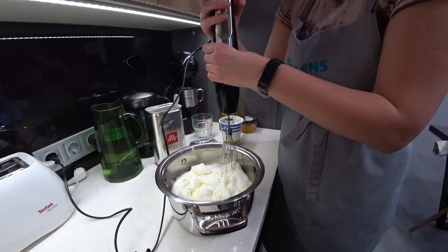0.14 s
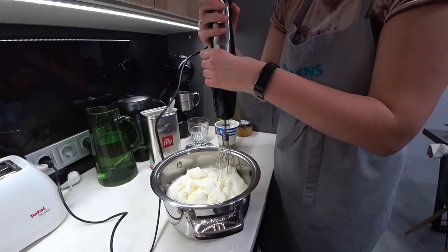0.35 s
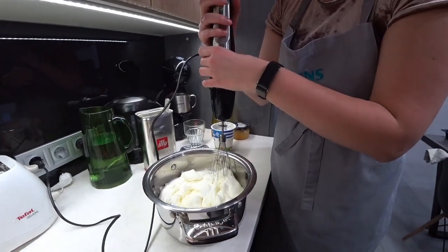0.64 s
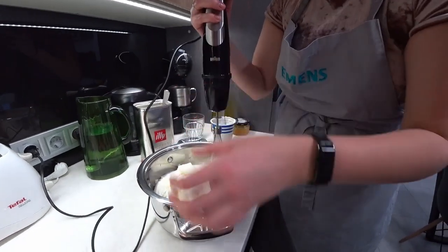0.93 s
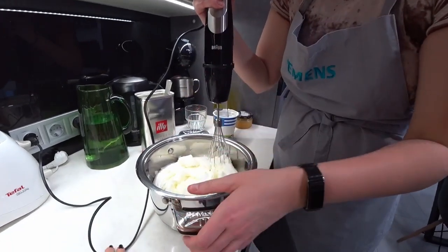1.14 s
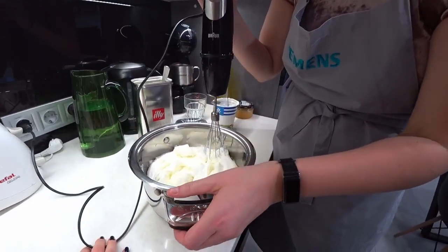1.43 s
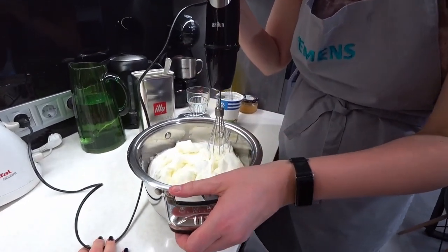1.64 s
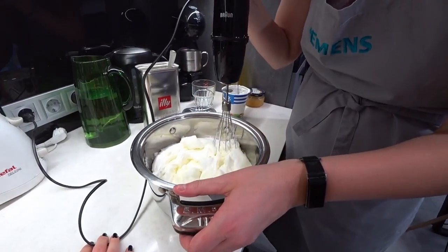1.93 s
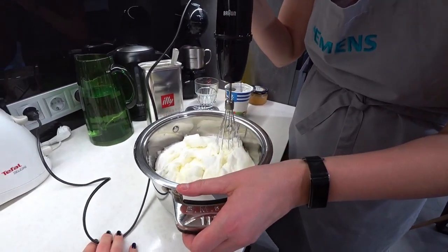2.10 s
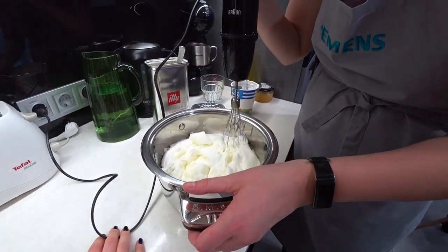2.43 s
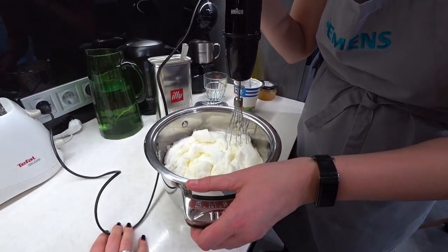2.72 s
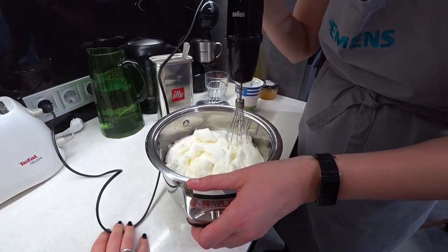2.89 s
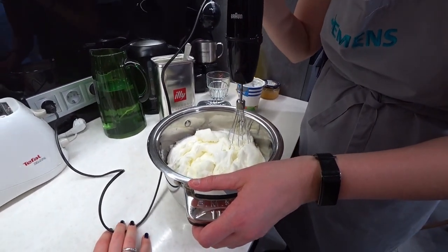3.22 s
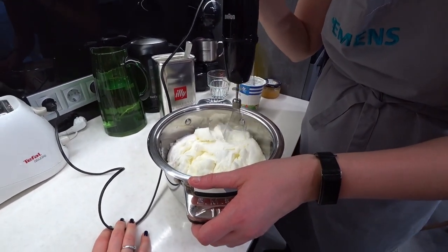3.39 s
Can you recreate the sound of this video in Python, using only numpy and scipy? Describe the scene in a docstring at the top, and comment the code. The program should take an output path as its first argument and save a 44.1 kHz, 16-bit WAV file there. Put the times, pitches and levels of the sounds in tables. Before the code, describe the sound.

An electric hand blender with a whisk starts only around 3.2 seconds, its motor pitch rising quickly into a loud whir with bright, dense metallic rattling until the abrupt end at about 3.55. Before that, low appliance hum, thin steady whine and soft scuffs; whisk ticks on the steel bowl, sharpest near 1.15 and 3.05, clustering around 2.3 and 2.75. Close stereo, short kitchen echo.

```python
"""Appliance hum, a thin whine and room air come first, with soft handling scuffs.
A whisk ticks against a steel bowl now and then: noise scrapes that ring clustered decaying sines.
Then a hand blender is switched on: shaft orders rise in pitch as the motor spins up, inside housing
noise, and the whisk rattles round the bowl as a hail of taps. Ticks and scuffs get a kitchen echo."""
import sys
import numpy as np
from scipy import signal
from scipy.fft import rfft, irfft
from scipy.io import wavfile
from scipy.ndimage import uniform_filter1d

SR = 44100
rng = np.random.default_rng(int(sys.argv[2]) if len(sys.argv) > 2 else 0)


def generate_wav(sig):
    """Save sig (samples, or channels by samples) to the path in sys.argv[1] as 16-bit PCM at SR."""
    pcm = np.round(np.clip(np.atleast_2d(sig).T, -1, 1) * 32767).astype(np.int16)
    wavfile.write(sys.argv[1], SR, pcm)


N = 156555

# Room air spectrum, relative: freq_hz, density_db_per_hz
AIR_SPECTRUM = [(8.8, -42), (15, 1), (33, 2.5), (68, -6.5), (185, -9), (207, -8), (265, -7.5), (312, -3.5),
                (401, -15), (447, -7.5), (486, -10), (715, -13.5), (799, -7.5), (868, -10.5), (1110, -12.5),
                (1880, -24.5), (11000, -45), (14300, -71), (22000, -120)]
# Slow offset of the air level: time_s, offset_db
AIR_OFFSET = [(0, 1.5), (.5, 1), (1, 1), (2, -0.5), (3.55, 1)]
# Air, left against right: freq_hz, likeness_0_to_1
AIR_LIKENESS = [(30, 1), (130, 0.95), (270, 0.9), (600, 1), (1500, 0.39), (5000, 0.33), (11000, 0.47)]
# Air, left ahead of right: freq_hz, lead_rad
AIR_LEAD = [(60, .05), (200, .4), (600, 1), (2150, 1.8), (5300, .9), (9000, 0), (11500, 0)]
# Air, left minus right: freq_hz, difference_db
AIR_LEFT_RIGHT = [(60, -1.5), (220, -0.5), (820, -2.5), (3050, -0.5), (11300, -1.2)]
# Faint hiss spectrum, relative: freq_hz, density_db_per_hz
HISS_SPECTRUM = [(710, 4), (1200, -38), (1330, -2), (1630, 9.5), (2170, -1), (3120, 0.5), (3650, -3),
                 (7520, -2), (11000, -6.5), (14300, -45), (22000, -120)]
# Faint hiss, course of its level before lift and patches: time_s, relative_db
HISS_COURSE = [(0.0, -60), (3.07, -70.5), (3.2, -61)]
# Fuzzy hum lines: freq_hz, level_db, width_hz
HUM_LINES = [(27.5, -71, 2.6), (323.5, -61.5, 8.1)]
# Appliance whine, mean of both channels: time_s, level_db
WHINE_LEVEL = [(0, -66), (.3, -64), (.6, -70), (1, -59), (1.1, -56.5), (1.6, -56), (2.2, -58), (2.5, -60),
               (2.9, -59), (3.3, -58)]
# Appliance whine: time_s, pitch_hz
WHINE_PITCH = [(0, 816), (1.1, 818), (3.3, 820)]
# Appliance motor overtones: multiple, level_db
COMPRESSOR_OVERTONES = [(3, -63), (4, -59), (5, -58), (6, -66)]
# Kitchen echo decay: freq_hz, t60_s
KITCHEN_DECAY = [(250, 0.25), (1000, 0.55), (3500, 0.26), (8000, 0.29), (11000, 0.26)]
# Soft handling noises: start_s, length_s, level_db, centre_hz, width_hz (per resonator pass)
SCUFFS = [(0, 0.1, -54.5, 5560, 5270), (0, 0.056, -56, 2640, 710), (0.119, 0.12, -62, 2770, 1500),
          (.03, 0.15, -55, 400, 202), (0.149, 0.021, -55.5, 1250, 300), (0.185, .07, -67, 9300, 2000),
          (0.426, 0.066, -58, 5960, 6000), (.96, 0.089, -59, 1890, 1200), (2.185, 0.027, -61, 1489, 2000),
          (2.258, 0.036, -57, 1600, 2420), (2.364, 0.1, -63.5, 1760, 1200), (3.116, 0.07, -53, 1070, 252.7),
          (3.138, 0.038, -52.5, 1820, 200), (3.2, 0.16, -48, 484, 51)]
# Whisk touching the bowl: start_s, gain_db, colour_db at 1, 2, 3.5, 6.5 and 9.5 kHz (5 columns),
# ring_db (re scrape), scrape_length_s, low_mode_db (re scrape)
TICKS = [(0.0574, -39, -18, -11, -15, -4, -7, -4, 0.0025, -25),
         (0.0666, -19.5, -12, -14.5, -11, -12.5, -18.5, -15, 0.0028, -19),
         (0.3022, -26.5, -22, -36, -60, -1.5, -12, -12, 0.00045, -25),
         (0.4786, -35, -9, -6, -9, -12, -31, -20, 0.0025, -27),
         (0.99, -24.5, -15, -14, -13, -19, -17.5, -20, 0.0011, -22),
         (1.086, -36.5, -3, -6, -20, -18, -19, -5, 0.0042, -16),
         (1.1568, -8, -31, -15.5, -16, -15, -27.5, -2.5, 0.0029, -32),
         (1.702, -41, 2, -8, -21, -8, -17, -13, 0.0031, -25),
         (1.8787, -50, -7, -12, -23, -10, -2.5, -7, 0.0033, -25),
         (2.2054, -34, -10, -8, -39, -38, -29, -5, 0.0034, -28),
         (2.2795, -37.5, 3, 0, -25, -29, -22, -14, 0.0025, -29),
         (2.2963, -39, 5, 3.5, -15, -36, -22, -9, 0.0023, -29),
         (2.3483, -29, 5, 0, -9, -25, -13, -10, 0.0024, -33),
         (2.3549, -28.5, -6, -4, -21.5, -18.5, -14, -5.5, 0.0045, -32),
         (2.4076, -39.5, 9, -20, -20, -15, -24, -15, 0.0029, -25),
         (2.7396, -22, -2.5, 0, -18, -10, -27, 0, 0.0029, -19.5),
         (2.7432, -20.5, -44, 4, -10, -25, -5, -35, 0.0019, -26),
         (2.7677, -17, -42, -36, -6.5, -17, -11, -23, 0.0021, -25),
         (2.7886, -35, -35, -1, -9, -8, -33, -15, 0.0025, -10),
         (3.0511, -7, -25, -17.5, -8.5, -16.5, -29.5, -5, 0.0021, -25),
         (3.1789, -27, -8, -9, -8, -10, -13, -7.5, 0.0017, -25),
         (3.2076, -35, -9, -8, -8, -21, -18, -13, 0.0028, -25),
         (3.2234, -32.5, -7, -9, -8, -14, -21, -12, 0.0035, -28),
         (3.258, -31.5, 6, -18, -22, -17, -7, -2, 0.0028, -25),
         (3.3016, -22, -5, -5, -27, -22, -12, -3, 0.0032, -23),
         (3.3185, -10.5, -14, -3, -13, -8, -22, -25, 0.0016, -33)]
# Points of the tick colour, bass first: freq_hz
TICK_BANDS_HZ = [300, 1000, 2000, 3500, 6500, 9500]
# Bowl mode clusters: nominal_hz, relative_db, t60_s
BOWL_MODES = [(1112, 1.5, 0.049), (1983, 9, 0.038), (3270, -11, 0.33), (3416, 17, 0.016), (3600, -21, 0.53),
              (3850, -15, 0.58), (5100, -4, 0.019), (5930, 5, 0.02), (7100, 4, 0.057)]
# Where the struck bowl speaks little: centre_hz, half_width_hz (1/e of the dip in dB), depth_db
BOWL_GAPS = [(2270, 260, -6.5)]
# Motor body gain: time_s, gain_db
MOTOR_GAIN = [(3.19, -44), (3.245, -56), (3.272, -38.5), (3.3, -34.5), (3.34, -24.5), (3.364, -24.5),
              (3.45, -24), (3.55, -23.5)]
# Motor orders: shaft_multiple, relative_db
SHAFT_ORDERS = [(1, -23), (1.8, -20.5), (4, -2.5), (5, -11.5), (6.2, -24), (11.8, -5), (16, -5)]
# Housing noise spectrum, relative: freq_hz, density_db_per_hz
HOUSING_SPECTRUM = [(59, -56), (100, -30), (199, -8.5), (299, -26), (349, -6.5), (456, -19.5), (764, -1.5),
                    (852, -6.5), (966, 7), (1060, -1.5), (2150, -1), (2600, -3), (3020, -1.5), (3650, -20),
                    (4200, -7), (5460, -43), (9240, -120)]
# Housing resonances: freq_hz, width_hz, relative_db
HOUSING_RINGS = [(679, 75, 0), (1200, 140, -4), (1920, 180, -1), (3200, 65, -10)]
# Whisk rattle spectrum, relative: freq_hz, density_db_per_hz
RATTLE_SPECTRUM = [(1760, -47), (3000, -9), (3650, -10), (4180, -5), (5400, -2.5), (5820, -2.5), (6220, 4),
                   (6710, -2), (7900, -1.5), (10600, -9.5), (14300, -22), (22000, -120)]
# Rattle resonances: freq_hz, width_hz, relative_db
RATTLE_RINGS = [(5130, 70, 2), (5450, 46, -3), (6170, 16, 4), (7700, 60, -8), (7700, 40, 5), (7860, 53, -2)]
# Rattle gain before the throb: time_s, gain_db
RATTLE_GAIN = [(3.19, -63), (3.25, -54), (3.29, -44.5), (3.33, -25.5), (3.37, -20), (3.55, -19)]
# Blender, left against right: freq_hz, likeness_0_to_1
MOTOR_LIKENESS = [(60, 1), (170, 0.72), (490, 0.87), (1390, 1), (3960, 0.92), (11300, 0.82)]
# Blender, ticks and scuffs, left ahead of right: freq_hz, lead_rad
NEAR_LEAD = [(60, 0), (200, .3), (860, .8), (2100, .85), (4000, .6), (6000, .3), (11500, .3)]
# Blender, ticks and scuffs, left minus right: freq_hz, difference_db
NEAR_LEFT_RIGHT = [(60, 3), (170, 2), (490, -1.5), (1390, -2), (3960, 0.5), (11300, 0.0)]

AIR_BASE_DB, HISS_LIFT_DB, HISS_PATCH_DB = -50, 2.0, 1.8
COMPRESSOR_HZ, COMPRESSOR_WAVER = 37.66, 0.0046  # waver: rms fraction of pitch
ECHO_DB, EDGE_HZ = -10, 11050
TICK_SAMPLES, TICK_LEAD_SAMPLES = 16384, 256
TICK_BASS_DB, TAIL_PER_LENGTH = -25.5, 9.4  # scrape dies 60 dB in so many of its lengths
SPIKE_DB = 7  # extra burst at the scrape onset
PARTNERS, PARTNER_SPREAD = 32, .055  # sines per cluster, fraction of pitch
LOW_MODE_HZ, LOW_MODE_T60_S = 2063, 0.44
SWITCH_S, SPIN_UP_S, SHAFT_HZ = 3.2, .09, 200.2  # spin-up time constant, final shaft speed
GEARING, WHISK_PEAK_S = 12.5, 3.44  # shaft turns per whisk turn, a peak of the single throb
ORDER_BLUR_HZ, ORDER_NOISE, ORDER_GROWTH = 32.5, 0.63, 4  # noise share 0-1, power of speed
THROB_DB, DOUBLE_THROB_DB, DOUBLE_PHASE_CYCLES = 1.5, 0.5, 0.017
TAPS_PER_S, PATCH_DB = 20000, 2.5


def gain_of(db):
    """dB to gain."""
    return 10 ** (np.asarray(db) / 20)


def evened(x):
    """Scales to rms 1."""
    return x / np.sqrt(np.mean(x ** 2) + 1e-20)


def smoothed(x, size, axis=-1):
    """Running mean along one axis."""
    return uniform_filter1d(x, size=size, axis=axis)


def read(points, hz):
    """Reads a table on a log-frequency axis."""
    f, value = np.transpose(points)
    return np.interp(np.log(hz + 1), np.log(f + 1), value)


def curve(rows):
    """Reads a time table at every sample."""
    times_s, values = np.transpose(rows)
    return np.interp(np.arange(N) / SR, times_s, values)


def resonate(x, hz, width_hz):
    """A one-pole resonance of gain 1 in a frame that turns with hz."""
    turn = np.exp(2j * np.pi * np.cumsum(hz * np.ones(len(x))) / SR)
    pole = np.exp(-np.pi * width_hz / SR)
    slow = signal.lfilter([1 - pole], [1, -pole], x / turn + 1e-18)
    return 2 * (turn * slow).real


def colour(x, points, edge_db=-50):
    """Filters by a spectrum that falls by edge_db in the octave below its first point."""
    hz = np.fft.rfftfreq(len(x), 1 / SR)
    first_hz, first_db = points[0]
    ends = [(first_hz / 2, first_db + edge_db)] + list(points)
    return irfft(rfft(x) * gain_of(read(ends, hz)), len(x))


def ports(x, other, likeness, lead, left_right):
    """Spreads x over two microphones; its twin, other, sets how far right departs from left."""
    hz = np.fft.rfftfreq(N, 1 / SR)
    left, twin = rfft(x), rfft(other)
    same = np.clip(read(likeness, hz), 0, 1)
    right = (same * left + np.sqrt(1 - same ** 2) * twin) * np.exp(-1j * read(lead, hz))
    half = gain_of(read(left_right, hz) / 2)
    return irfft(np.array([left * half, right / half]), N)


def room_tone():
    """Broad air noise, a faint patchy hiss, fuzzy hum lines and a thin whine."""
    pair = []
    patches = evened(smoothed(smoothed(rng.standard_normal(N), 1500), 1500))
    air_gain = gain_of(AIR_BASE_DB + curve(AIR_OFFSET))
    hiss_gain = gain_of(curve(HISS_COURSE) + HISS_LIFT_DB + HISS_PATCH_DB * patches)
    for _ in range(2):
        air = air_gain * evened(colour(rng.standard_normal(N), AIR_SPECTRUM))
        hiss = hiss_gain * evened(colour(rng.standard_normal(N), HISS_SPECTRUM))
        hum = sum(gain_of(db) * evened(resonate(rng.standard_normal(N), hz, width_hz))
                  for hz, db, width_hz in HUM_LINES)
        pair.append(air + hiss + hum)
    whine_phase = 2 * np.pi * np.cumsum(curve(WHINE_PITCH)) / SR
    whine = np.sqrt(2) * gain_of(curve(WHINE_LEVEL)) * np.sin(whine_phase)
    noises = ports(*pair, AIR_LIKENESS, AIR_LEAD, AIR_LEFT_RIGHT)
    return noises + whine * gain_of([[-1.1], [1.1]])


def compressor():
    """Steady overtones of a slowly wavering appliance motor."""
    waver = evened(smoothed(smoothed(rng.standard_normal(N), 9000), 9000))
    turns = np.cumsum(COMPRESSOR_HZ * (1 + COMPRESSOR_WAVER * waver)) / SR
    return sum(np.sqrt(2) * gain_of(db) * np.sin(2 * np.pi * (k * turns + rng.random()))
               for k, db in COMPRESSOR_OVERTONES)


def kitchen(x):
    """Echo: sparse taps of random sign, each band dying at its own speed."""
    taps = np.zeros((2, SR // 2))
    slots = np.arange(200, SR // 2 - 20, 20)
    at = slots + rng.integers(0, 20, (2, len(slots)))
    np.put_along_axis(taps, at, rng.choice([-1., 1.], at.shape), 1)
    hz, t, z = signal.stft(taps, SR, nperseg=256)
    decay = gain_of(-60 * t / read(KITCHEN_DECAY, hz)[:, None])
    tail = signal.istft(z * decay, SR, nperseg=256)[1]
    return signal.fftconvolve(x[None], tail / np.linalg.norm(tail[0]), axes=1)[:, :N]


def scuffs():
    """Short swells of grainy noise through two equal resonators."""
    out = np.zeros(N)
    for start_s, length_s, db, hz, width_hz in SCUFFS:
        size, at = round(length_s * SR), round(start_s * SR)
        noise, roughness = rng.standard_normal((2, size))
        grains = noise * gain_of(22.0 * smoothed(roughness, 60))
        band = resonate(resonate(grains, hz, width_hz), hz, width_hz)
        out[at:at + size] += gain_of(db) * evened(band) * np.sqrt(np.hanning(size))
    return out


def bowl_rings(t):
    """Mode clusters and lingering low mode, one row a touch; beating partners have random signs."""
    detune = 1 + PARTNER_SPREAD * rng.uniform(-0.91, 1, (len(BOWL_MODES), PARTNERS, 1))
    modes = np.concatenate([gain_of(db - 60 * t / t60_s) * np.sin(2 * np.pi * hz * d * t)
                            for (hz, db, t60_s), d in zip(BOWL_MODES, detune)])
    rings = rng.choice([-1., 1.], (len(TICKS), len(modes))) @ modes
    low_detune = 1 + PARTNER_SPREAD * rng.uniform(-1, 1, (PARTNERS, 1)) ** 3
    low = gain_of(-60 * t / LOW_MODE_T60_S) * np.sin(2 * np.pi * LOW_MODE_HZ * t * low_detune)
    lows = rng.choice([-1., 1.], (len(TICKS), PARTNERS)) @ low
    return rings, lows


def ticks():
    """Each touch is a short scrape of noise with its own colour that also rings the bowl."""
    out, t = np.zeros(N + TICK_SAMPLES), np.arange(TICK_SAMPLES) / SR
    draws = rng.standard_normal((len(TICKS), TICK_SAMPLES))
    rings, lows = bowl_rings(t)
    hz = np.fft.rfftfreq(TICK_SAMPLES, 1 / SR)
    gaps = gain_of(sum(db * np.exp(-((hz - centre_hz) / width_hz) ** 2)
                       for centre_hz, width_hz, db in BOWL_GAPS))
    onset = np.clip(t * SR / 8 - 31, 0, 1)  # mutes filter spill ahead of the touch
    spike = 1 + gain_of(SPIKE_DB) * np.exp(-t / 0.00046)
    for row, noise, ring, low in zip(TICKS, draws, rings, lows):
        start_s, db, *bands_db, ring_db, length_s, low_db = row
        fall_db = -60 * np.maximum(t / length_s - 1, 0) / TAIL_PER_LENGTH
        scrape = noise * np.minimum(t / 0.00049, 1) * gain_of(fall_db) * spike
        ringing = ring * gain_of(ring_db) / np.linalg.norm(ring)
        ringing = ringing + low * gain_of(low_db) / np.linalg.norm(low)
        touch = scrape + ringing * np.linalg.norm(scrape)
        late = irfft(rfft(np.roll(touch, TICK_LEAD_SAMPLES)) * gaps)
        sound = colour(late, list(zip(TICK_BANDS_HZ, [TICK_BASS_DB] + bands_db))) * onset
        at = round(start_s * SR) - TICK_LEAD_SAMPLES
        out[at:at + TICK_SAMPLES] += gain_of(db) * sound
    return out[:N]


def tap_hail(rings, spectrum, ring_db):
    """A dense, uneven hail of small taps through a broad colour and a few narrow rings."""
    taps = rng.standard_normal(N) * (rng.random(N) < TAPS_PER_S / SR)
    z = signal.stft(taps, nperseg=256)[2]
    # loud and soft patches in frequency and time
    patches = evened(smoothed(smoothed(rng.standard_normal(z.shape), 4, axis=0), 5, axis=1))
    taps = signal.istft(z * gain_of(PATCH_DB * patches), nperseg=256)[1][:N]
    rung = sum(gain_of(db) * evened(resonate(taps, hz, width_hz)) for hz, width_hz, db in rings)
    return evened(evened(colour(taps, spectrum)) + gain_of(ring_db) * evened(rung))


def shaft_order(multiple, turns, shaft_hz):
    """One motor order: a sine locked to the shaft plus a noise band that follows it."""
    tone = np.sqrt(2) * np.sin(2 * np.pi * (multiple * turns + rng.random()))
    blur = evened(resonate(rng.standard_normal(N), multiple * shaft_hz, ORDER_BLUR_HZ))
    return (1 - ORDER_NOISE) * tone + ORDER_NOISE * blur


def blender():
    """The shaft spins up; its orders sing in housing noise; the rattle throbs with the whisk turn."""
    since_s = np.maximum(np.arange(N) / SR - SWITCH_S, 0)
    shaft_hz = SHAFT_HZ * (1 - np.exp(-since_s / SPIN_UP_S))
    turns = np.cumsum(shaft_hz) / SR
    whisk_rad = 2 * np.pi * (turns - turns[round(WHISK_PEAK_S * SR)]) / GEARING
    throb_db = THROB_DB * np.cos(whisk_rad)
    throb_db += DOUBLE_THROB_DB * np.cos(2 * whisk_rad + 2 * np.pi * DOUBLE_PHASE_CYCLES)
    on = np.minimum(since_s / 0.018, 1)
    pair = []
    for _ in range(2):
        orders = sum(gain_of(db) * shaft_order(k, turns, shaft_hz) for k, db in SHAFT_ORDERS)
        orders = orders * (shaft_hz / SHAFT_HZ) ** ORDER_GROWTH
        housing = tap_hail(HOUSING_RINGS, HOUSING_SPECTRUM, ring_db=-8)
        body = gain_of(curve(MOTOR_GAIN)) * (housing + orders)
        rattle = tap_hail(RATTLE_RINGS, RATTLE_SPECTRUM, ring_db=-9.5)
        pair.append(on * (body + gain_of(curve(RATTLE_GAIN) + throb_db) * rattle))
    return ports(*pair, MOTOR_LIKENESS, NEAR_LEAD, NEAR_LEFT_RIGHT)


def scene():
    """Room tone, appliance motor, ticks and scuffs with their echo, and the blender."""
    near = scuffs() + ticks()
    direct = ports(near, near, [(60, 1), (11000, 1)], NEAR_LEAD, NEAR_LEFT_RIGHT)
    echo = gain_of(ECHO_DB) * kitchen(near)
    return room_tone() + compressor() + echo + direct + blender()


def record(dry):
    """Low-pass band limit at EDGE_HZ."""
    taps = signal.firwin(1023, EDGE_HZ, window=("kaiser", 9), fs=SR)
    return signal.oaconvolve(dry, taps[None], "same")


dry = scene()
out = record(dry)
generate_wav(out)
```